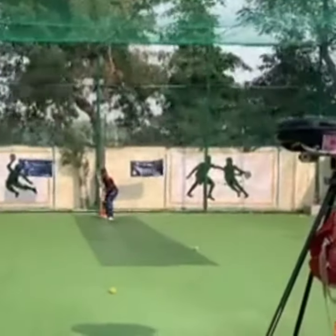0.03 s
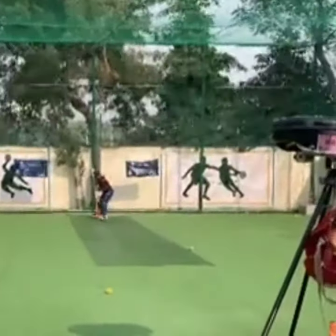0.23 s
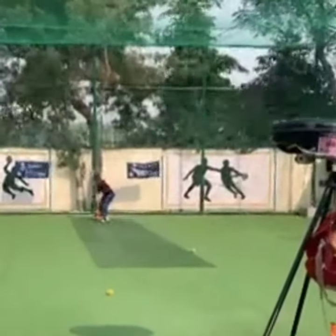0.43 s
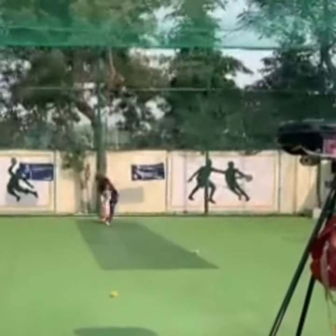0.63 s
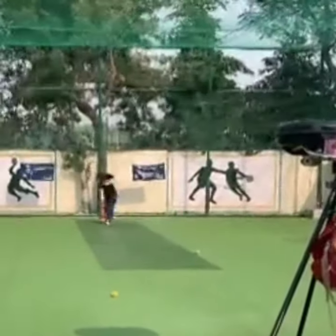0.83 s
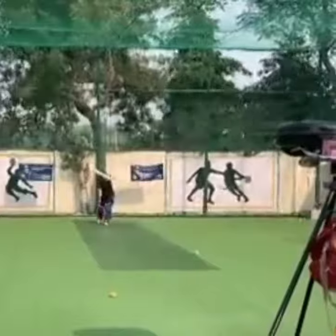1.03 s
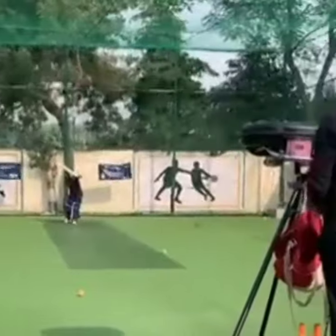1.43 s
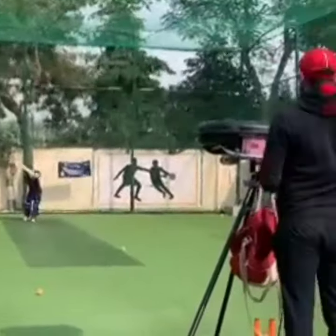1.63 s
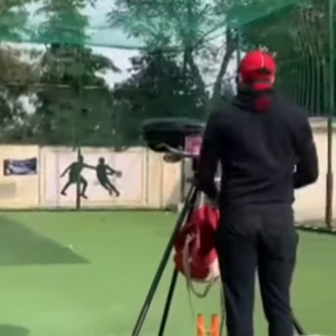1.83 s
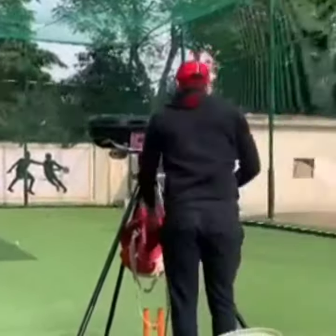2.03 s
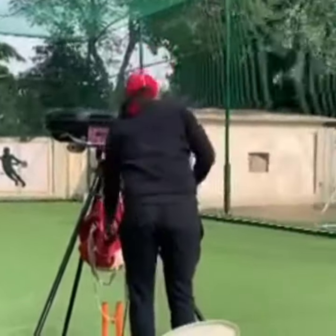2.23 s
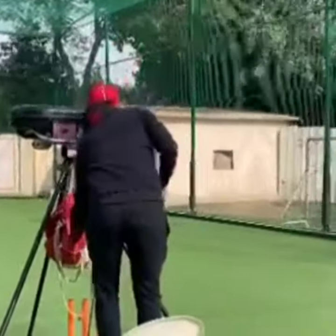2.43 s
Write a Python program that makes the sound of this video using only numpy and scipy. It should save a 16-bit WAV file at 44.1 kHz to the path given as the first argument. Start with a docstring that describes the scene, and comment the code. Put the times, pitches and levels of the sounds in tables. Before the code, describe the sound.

One sharp crack of a wooden bat rings off the walls of an outdoor practice net. Just before it, a humming bowling machine close to the microphone thumps out the ball; afterwards come faint ticks and a soft thud.

```python
"""A hollow thump over a steady hum: a bowling machine fires a ball, close beside the microphone.
Half a second later, down the outdoor practice net, a wooden bat cracks and the walls answer.
The ball ticks on turf and net, and something thuds softly nearby.
Under it all lie the hum of the spinning wheels, a low outdoor rumble and a faint hiss."""
import sys
import numpy as np
from scipy import signal
from scipy.fft import rfft, irfft
from scipy.io import wavfile

SR = 44100
rng = np.random.default_rng(int(sys.argv[2]) if len(sys.argv) > 2 else 0)


def transcribe(u):
    """Save the signal u as a 16-bit wav file named by the first command-line argument.

    u: samples, shape (n,) or (channels, n), limited to [-1, 1]; the rate is SR.
    q: integer samples, one column per channel.
    """
    v = np.clip(np.atleast_2d(u).T, -1, 1)
    q = np.round(v * 32767).astype(np.int16)
    wavfile.write(sys.argv[1], SR, q)


N = 110250
TIME = np.arange(N) / SR
FREQS = np.fft.rfftfreq(N, 1 / SR)

# modes of bat and ball: f/Hz, level/dB, t60/s
BAT_MODES = [(1170, -24, 0.0072), (2080, -19, 0.014), (2763, -16, 0.033), (3650, -17, 0.03),
             (4190, -13.5, 0.012), (4830, -16, 0.016), (6560, -16, 0.021), (7960, -13.5, 0.014),
             (9630, -20.5, 0.023)]
# spectrum of the crack: f/Hz, relative level/dB
CRACK_SPECTRUM = [(700, 3), (1200, 6.5), (1900, 1), (2700, -5), (3200, 1), (4000, 11.5), (5100, -1),
                  (5900, 4), (7000, -6), (8000, 2.5), (9300, -6), (10200, -10), (11200, -14), (12500, -19)]
# walls around the batter: delay/s, knock level/dB, crack level/dB, left minus right/dB, right lag/s
BAT_WALLS = [(0.0127, -21, -33, -2, 0), (0.0203, -25, -7, -4, .00004), (0.0382, -16, -30, -6, 0),
             (.0465, -8, -18, 2, .0001), (.056, -28, -14.5, 2, -.0002)]
# spectrum of the yard's answer to the bat: f/Hz, relative level/dB
BAT_TAIL_SPECTRUM = [(90, -3), (160, 3.5), (300, 4), (600, -0.5), (1100, -8), (2000, -13), (2720, -8.5),
                     (3100, -11.5), (3550, -10.5), (4000, -15), (4400, -9.5), (5200, -13), (6500, -8),
                     (8000, -13), (10000, -17), (11300, -18), (12500, -34)]
# decay of the yard at the batter's end: f/Hz, t60/s
BAT_TAIL_DECAY = [(70, 1.7), (160, 1.1), (420, 1.08), (1100, 0.83), (2900, 1.48), (5500, 0.67),
                  (9000, 0.44)]


def bat_hit(at=0.704, right_lag_s=0.000215):
    """A bat hit down the net, heard as a brief crack over a short falling-pitch knock, then echoes."""
    start_hz, end_hz, fall_s = 1065, 148, 0.0022
    rise_s, knock_s, contact_s = 0.00041, 0.006, 0.0045
    age = np.maximum(TIME - at, 0)
    pitch = (TIME >= at) * (end_hz + (start_hz - end_hz) * np.exp(-age / fall_s))
    swell = (1 - np.exp(-age / rise_s)) / (1 + (age / knock_s) ** 5)
    knock = -amp(-8.5) * swell * np.sin(2 * np.pi * np.cumsum(pitch) / SR)
    contact = (TIME >= at) / (1 + (age / contact_s) ** 6)
    wood = amp(-1.5) * stereo_pair(ring(click(at), BAT_MODES), right_lag_s)
    crack = amp(-15) * noise(CRACK_SPECTRUM) * contact + wood
    out = stereo_pair(knock, right_lag_s) + crack + scattered_echoes(crack)
    for delay, knock_db, crack_db, pan_db, lag in BAT_WALLS:
        slap = late(amp(knock_db) * knock + amp(crack_db) * crack[0], delay)
        out = out + panned(stereo_pair(slap, lag), pan_db)
    tail = yard_tail(at + contact_s, BAT_TAIL_SPECTRUM, BAT_TAIL_DECAY, rise=0.012)
    return out + amp(-24.5) * tail


def scattered_echoes(crack, per_s=110, first_s=0.032, t60=0.63):
    """Poles and trunks throw back small, fading copies of the crack, different in each channel."""
    age = TIME - first_s
    arrives = (rng.random((2, N)) < per_s / SR) * (age > 0)
    echoes = arrives * rng.uniform(-1, 1, (2, N)) * amp(-15 - 60 * age / t60)
    return signal.fftconvolve(crack, echoes, axes=1)[:, :N]


# the wheels grip the ball, then let it go: t/s, level/dB, contact width/s
WHEEL_PUSHES = [(0.1996, -13, 0.00031), (0.2071, -9, 0.000084)]
# modes of the machine's housing: f/Hz, level/dB, t60/s
HOUSING_MODES = [(186, -30, 0.29), (228.5, -2.5, 0.26), (258.5, -4.5, 0.08), (282, -1.5, 0.11),
                 (408, -28.5, 0.15), (525, -14.5, 0.06), (556, -20, .12), (957, -15.5, 0.1),
                 (990, -16, 0.14), (1020, -40, .1), (1550, -22.5, 0.18), (1780, -25, 0.092),
                 (2030, -21.5, 0.17)]
# rubber scuffing the ball, and the rattle after it: f/Hz, relative level/dB
SCUFF_SPECTRUM = [(300, 10.5), (600, -2), (1000, 4.5), (2000, 1), (2500, -12.5), (5200, -10.5), (6500, -38),
                  (8300, -24), (10000, -12), (11500, -24), (13000, -31)]
# the spit of the ball through the wheels: f/Hz, relative level/dB
SPIT_SPECTRUM = [(900, 16.5), (2500, -3), (4500, -2), (6500, -10), (8300, 3.5), (11000, -5), (12500, -12)]
# near and far walls returning the boom: delay/s, level/dB
SHOT_WALLS = [(0.0189, -12.5), (0.036, -10.5), (.134, -19), (0.187, -25), (.226, -31)]
# spectrum of the yard's answer to the shot: f/Hz, relative level/dB
SHOT_TAIL_SPECTRUM = [(50, -7), (80, -3), (130, -4), (230, 3), (320, -6.5), (450, -18.5), (1000, -18.5),
                      (1800, -27), (2700, -38.5), (5000, -36), (7000, -43.5), (9500, -31), (12000, -39)]
# decay of the yard at the microphone's end: f/Hz, t60/s
SHOT_TAIL_DECAY = [(70, 1.7), (200, 1.3), (420, 1.14), (1100, 0.75), (2900, 1.9), (9000, 0.38)]


def machine_shot(spit_at=0.1962, spit_length_s=0.02):
    """Beside the microphone, the wheels squeeze the ball out and the housing booms into the yard."""
    force = sum(amp(db) * push(at, width) for at, db, width in WHEEL_PUSHES)
    boom = butterworth(ring(force, HOUSING_MODES), "high", hz=135, order=2)
    boom = butterworth(boom, "low", hz=2170, order=4)
    scuff = amp(-21.5) * noise(SCUFF_SPECTRUM) * burst(at=0.1975, rise=0.0076, t60=0.17)
    spit_envelope = (TIME >= spit_at) / (1 + ((TIME - spit_at) / spit_length_s) ** 10)
    spit = amp(-34.5) * noise(SPIT_SPECTRUM) * spit_envelope
    echoes = sum(amp(db) * late(boom, delay) for delay, db in SHOT_WALLS)
    dull_echoes = butterworth(echoes, "low", hz=606, order=2)
    release_at = WHEEL_PUSHES[-1][0]
    tail = yard_tail(release_at, SHOT_TAIL_SPECTRUM, SHOT_TAIL_DECAY, rise=0.016)
    return boom + scuff + spit + dull_echoes + amp(-22.5) * tail


# knocks on turf and net, the last row a soft footstep: peak t/s, thud level/dB, f/Hz, scuff level/dB, tick
# level/dB
KNOCKS = [(0.332, -27, 260, -43, -49), (0.478, -22, 213, -50, -41), (.609, -39, 259, -33.5, -42),
          (.661, -26, 252, -69, -49), (1.026, -29, 320, -39.5, -33.5), (2.05, -16.5, 332, -48, -37.5),
          (2.132, -30, 363, -65, -57), (2.157, -37, 370, -67, -57), (2.203, -35.5, 130, -62, -45)]
# spectrum of a scuff on the turf: f/Hz, relative level/dB
TURF_SPECTRUM = [(400, -1), (1500, 18.5), (3000, 2), (5000, 14), (9000, 3), (13000, 1)]
# modes of the hard ball: f/Hz, level/dB, t60/s
BALL_MODES = [(935, -6, 0.012), (1437, -4, 0.016), (1716, -9.5, 0.031)]


def soft_knocks(lead_s=0.00293, wall_delay_s=0.033):
    """Around the net, a scuff and a tick lead each thud; a wall behind the machine echoes the thud."""
    thuds = scuffing = taps = 0
    for at, thud_db, hz, scuff_db, tick_db in KNOCKS:
        thuds += amp(thud_db) * thud(at, hz)
        scuffing += amp(scuff_db) * burst(at - lead_s, rise=0.0003, t60=0.024)
        taps += amp(tick_db) * click(at - lead_s)
    echo = amp(-8) * late(thuds, wall_delay_s)
    return thuds + echo + noise(TURF_SPECTRUM) * scuffing + ring(taps, BALL_MODES)


def thud(at, hz, sag_s=0.018, half_width_cycles=0.45):
    """A dead knock of about two cycles that sags in pitch; peak 1."""
    t = np.clip(TIME - at, -0.03, 0.03)
    cycles = hz * sag_s * (1 - np.exp(-t / sag_s))
    return -np.cos(2 * np.pi * cycles) * np.exp(-0.5 * (t * hz / half_width_cycles) ** 2)


def yard_tail(at, spectrum, decay, rise, ripple_db=3.2, ripple_hz=70, grain_db=2.3):
    """Walls, net and trees blur into a tail, uneven in time and pitch; each octave has its own decay."""
    knots = np.arange(0, SR / 2, ripple_hz)
    ripple = np.interp(FREQS, knots, rng.standard_normal(len(knots)) * (knots > 1000))
    rippled = rfft(noise(spectrum)) * amp(ripple_db * ripple)
    octaves_hz = np.geomspace(50, 12800, 9)
    out = 0
    for hz, share in zip(octaves_hz, np.eye(len(octaves_hz))):
        band = irfft(rippled * at_hz(np.c_[octaves_hz, share], FREQS), N)
        grain = amp(grain_db * drift(rate_hz=min(170, hz / 10)))
        out += band * grain * burst(at, rise, at_hz(decay, hz))
    return out


# tones of the wheels and motor: f/Hz, level/dB
HUM_TONES = [(70, -54), (194, -49), (227, -53.5), (262, -51.5), (325, -61), (878, -67.5), (980, -69),
             (1184, -64), (1230, -69.5)]


def machine_hum(depth=0.45, waver_hz=9.8):
    """Close by, the idling wheels and motor hum, each tone wavering in level and phase."""
    out = 0
    for hz, db in HUM_TONES:
        waver = 1 + depth * (drift(waver_hz) + 1j * drift(waver_hz))
        tone = np.exp(2j * np.pi * (hz * TIME + rng.random()))
        out += amp(db) * np.sqrt(2) * np.real(waver * tone)
    return out


# spectrum of the distant rumble: f/Hz, relative level/dB
RUMBLE_SPECTRUM = [(32, -4), (45, -4), (58, -7.5), (72, 2.5), (90, -11.5), (110, -11)]
# the rumble swelling and sinking: t/s, level/dB
RUMBLE_SWELL = [(0, -42.5), (.7, -48.5), (1.3, -47.5), (1.55, -37.5), (1.64, -41), (1.71, -37), (1.8, -46),
                (1.95, -45.5), (2.5, -50.5)]
# whirr of the machine and the street: f/Hz, relative level/dB
WHIRR_SPECTRUM = [(95, -1.5), (130, 3), (170, -3), (260, 0.5), (350, -5.5), (480, -11.5), (700, -17.5),
                  (950, -14.5), (1200, -17.5), (1500, -18.5)]
# spectrum of the open-air hiss: f/Hz, relative level/dB
HISS_SPECTRUM = [(1300, -30), (1700, 4.5), (2400, -1), (3400, 1.5), (4200, 2), (6300, 1), (7200, -1.5),
                 (9200, -6.5), (11500, -15.5), (13000, -10.5)]
# the hiss's swing, taken about its mean: t/s, relative level/dB
HISS_SWING = [(0.0, -54), (0.142, -49.5), (0.18, -50.5), (0.5, -56), (0.512, -56.5), (0.69, -48.5),
              (1.25, -52.5), (1.36, -55.5), (1.44, -50), (1.51, -56.5), (1.59, -51), (1.64, -54.5),
              (1.715, -48.5), (1.788, -56.5), (1.872, -49.5), (1.97, -55), (1.994, -49.5), (2.064, -50),
              (2.106, -56), (2.192, -50), (2.308, -56), (2.352, -50.5), (2.458, -54.5), (2.5, -50)]


def outdoors():
    """Around the microphone: distant rumble, a steady whirr and a faint hiss that swells and sinks."""
    rumble = amp(np.interp(TIME, *np.transpose(RUMBLE_SWELL))) * noise(RUMBLE_SPECTRUM)
    whirr = amp(-44) * noise(WHIRR_SPECTRUM)
    swing_db = np.interp(TIME, *np.transpose(HISS_SWING))
    hiss = amp(-52.5 + swing_db - swing_db.mean()) * noise(HISS_SPECTRUM)
    return rumble + whirr + hiss


# likeness of left and right in the noise (centred bass, wide middle, very wide top): f/Hz, correlation
NOISE_LIKENESS = [(60, 0.94), (260, 0.85), (500, 0.27), (1200, -0.11), (2500, -0.07), (5000, 0.12),
                  (7100, -.4), (9300, 1), (10200, 0.39), (11000, -0.86)]


def noise(spectrum):
    """Stereo noise of a given colour, centred in the bass and mostly wide above it; rms 1."""
    mid, side = rfft(rng.standard_normal((2, N)))
    alike = np.clip(at_hz(NOISE_LIKENESS, FREQS), -1, 1)
    stereo = np.sqrt(1 + alike) * mid + np.sqrt(1 - alike) * side * [[1], [-1]]
    low_hz, high_hz = 0.8 * spectrum[0][0], 1.1 * spectrum[-1][0]
    skirts = 1 / np.sqrt((1 + (low_hz / (FREQS + 1)) ** 8) * (1 + (FREQS / high_hz) ** 16))
    return unit_rms(irfft(skirts * amp(at_hz(spectrum, FREQS)) * stereo, N))


def drift(rate_hz):
    """A smooth random wander; rms 1."""
    return unit_rms(irfft(rfft(rng.standard_normal(N)) / (1 + (FREQS / rate_hz) ** 2) ** 2, N))


def ring(force, modes):
    """A force sets a body's damped modes ringing."""
    out = 0
    for hz, db, t60 in modes:
        radius, angle = np.exp(-np.log(1000) / (t60 * SR)), 2 * np.pi * hz / SR
        feedback = [1, -2 * radius * np.cos(angle), radius ** 2]
        out += amp(db) * signal.lfilter([0, np.sin(angle)], feedback, force)
    return out


def click(at):
    """A hard contact: one unit impulse."""
    return (np.arange(N) == int(at * SR)) + 1e-18


def push(at, width):
    """A soft contact: a unit impulse spread over a short time."""
    bump = np.exp(-0.5 * ((TIME - at) / width) ** 2) + 1e-18
    return bump / bump.sum()


def burst(at, rise, t60):
    """An envelope that swells and dies away; times in seconds."""
    age = np.maximum(TIME - at, 0)
    return (1 - np.exp(-age / rise)) * amp(-60 * np.minimum(age / t60, 4))


def late(x, delay_s):
    """Delay a mono sound."""
    return np.interp(TIME - delay_s, TIME, x, left=0)


def stereo_pair(x, lag_s):
    """A sound from one side reaches the right channel lag_s after the left."""
    return np.array([x, late(x, lag_s)])


def panned(x, db):
    """Lean a sound left (+) or right (-)."""
    return x * amp(np.array([[db], [-db]]) / 2)


def butterworth(x, kind, hz, order):
    """Low-pass or high-pass a sound."""
    return signal.sosfilt(signal.butter(order, hz, kind, fs=SR, output="sos"), x)


def at_hz(points, hz):
    """Read a table on a log-frequency axis."""
    freqs, values = np.transpose(points)
    return np.interp(np.log(np.maximum(hz, 1)), np.log(freqs), values)


def amp(db):
    """Decibels to gain."""
    return 10 ** (np.asarray(db) / 20)


def unit_rms(x):
    """Scale to rms 1."""
    return x / np.sqrt(np.mean(x ** 2) + 1e-20)


def scene():
    """The practice net from beside the machine, leaning slightly to the right."""
    return panned(machine_shot() + bat_hit() + soft_knocks() + machine_hum() + outdoors(), db=-1)


def record(dry):
    """The microphone rounds the highest peaks and loses the deepest bass and the top treble."""
    rounded = np.tanh(dry / 1.171) * 1.245
    x = butterworth(rounded, "high", hz=33, order=3)
    x = butterworth(x, "low", hz=11800, order=6)
    steep_cutoff_hz = 13280
    return signal.sosfilt(signal.ellip(10, 0.2, 80, steep_cutoff_hz, fs=SR, output="sos"), x)


dry = scene()
out = record(dry)
transcribe(out)
```